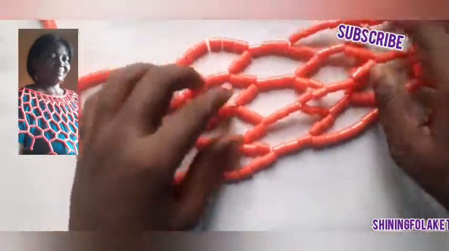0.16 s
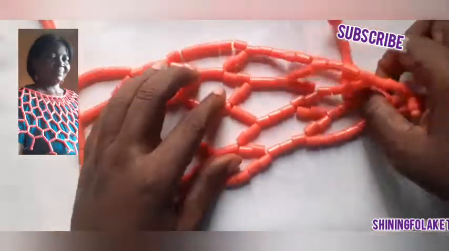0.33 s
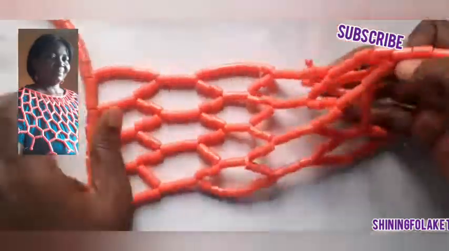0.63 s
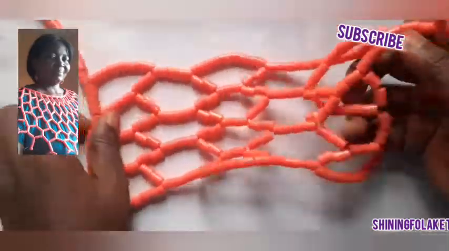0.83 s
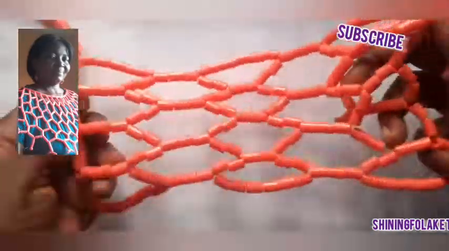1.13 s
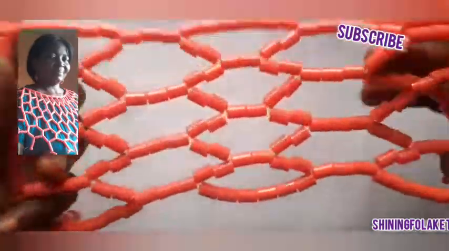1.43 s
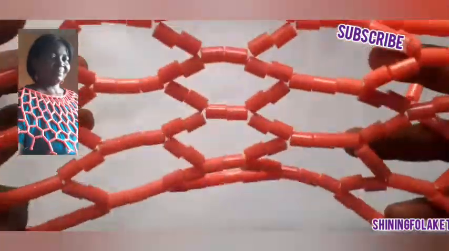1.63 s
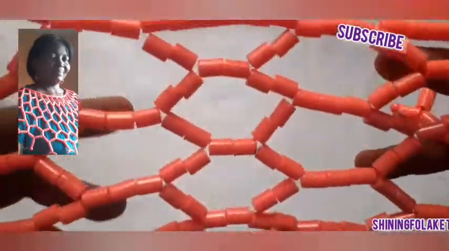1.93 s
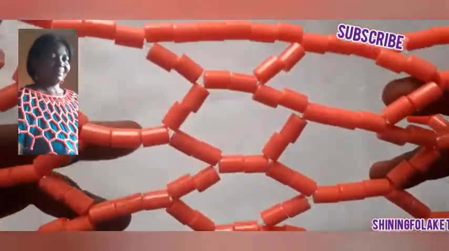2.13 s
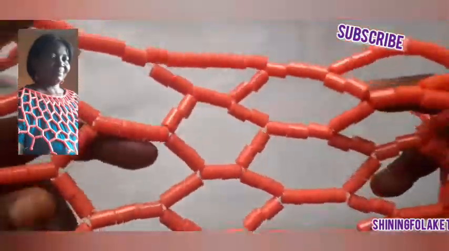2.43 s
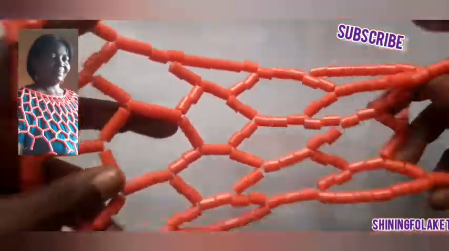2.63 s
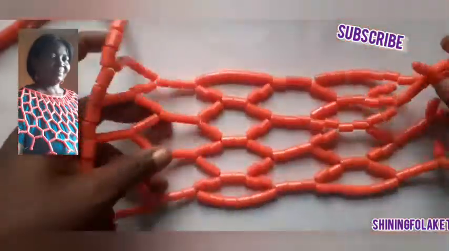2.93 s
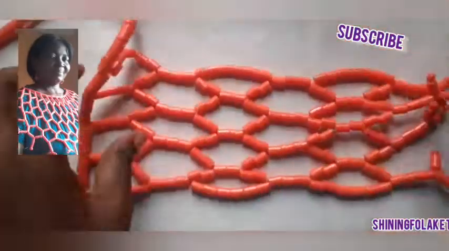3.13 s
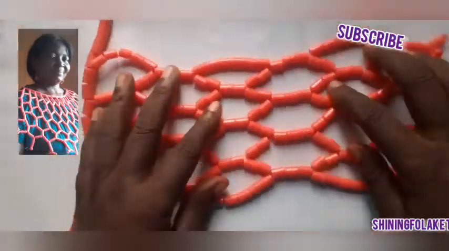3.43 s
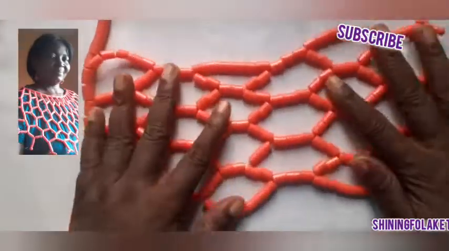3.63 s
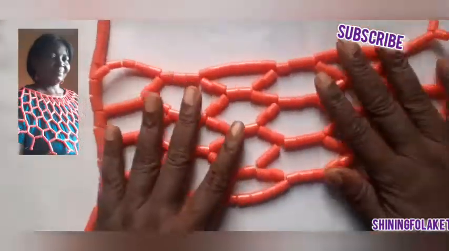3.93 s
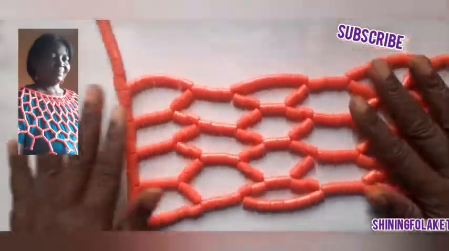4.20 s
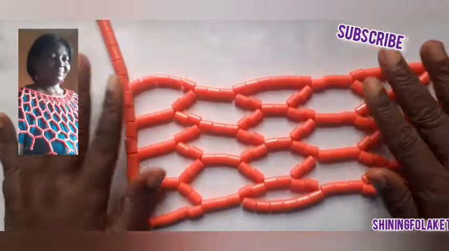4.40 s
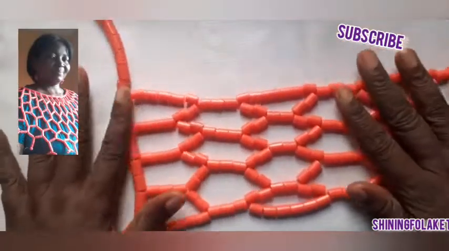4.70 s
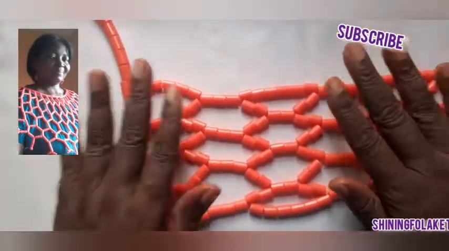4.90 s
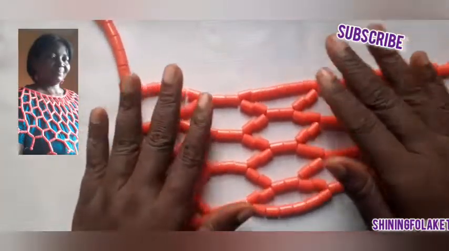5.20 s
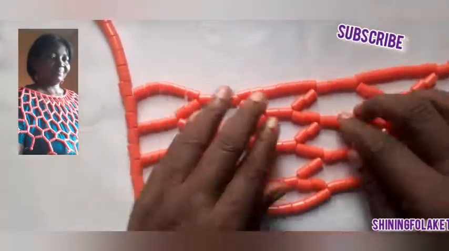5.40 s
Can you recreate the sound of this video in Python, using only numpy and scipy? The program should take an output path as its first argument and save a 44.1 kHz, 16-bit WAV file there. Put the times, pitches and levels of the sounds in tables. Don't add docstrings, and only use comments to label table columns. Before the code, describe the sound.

Close, dry stereo sound in a small quiet room with a faint low hum. From 0 to 0.6 s, hollow plastic beads are dragged in short bright rattles, with a cluster of sharp clicks near 0.2 s and soft finger thumps. A fuller thump comes at 0.7 s; strokes thin and fade to about 1.5 s as the net lifts. From 1.5 to 2.5 s it is nearly silent, with only tiny thin ticks of swinging strings. At 2.6 s rattling returns; between 2.7 and 3.7 s the net lands with dense clatter, hard snaps near 3.0, 3.25 and 3.7 s, and hollow table knocks. Smoothing slides follow to 4.3 s, then a gap. Low, dull thumps at 4.5 s and, strongest, 5.0 s come with brief rubs; two more near 5.5 s end with a short bead slide. Beads have a crisp high rattle; the table booms briefly, weighted to the right.

```python
import sys
import numpy as np
from scipy import signal
from scipy.fft import rfft, irfft, next_fast_len
from scipy.io import wavfile
from scipy.ndimage import map_coordinates

SR = 44100
rng = np.random.default_rng(int(sys.argv[2]) if len(sys.argv) > 2 else 0)


def wav_record(signal):
    frames = np.transpose(np.atleast_2d(signal))
    bounded = np.clip(frames, -1, 1)
    quanta = np.round(bounded * 32767).astype(np.int16)
    wavfile.write(sys.argv[1], SR, quanta)


def gain_from_db(level_db):
    decades = np.asarray(level_db, float) / 20
    return 10 ** decades


N = 244755
STEP = 32
SIDES = np.array([[1], [-1]])

# f/Hz, level/dB [dB per Hz]
RATTLE_SPECTRUM = [(260, -34), (450, -27.5), (492, -40), (625, -41), (748, -38), (1300, -36.5),
                   (1470, -12.5), (2510, -6.5), (4430, -15.5), (8290, -12.5), (10100, -26), (15100, -12.5),
                   (16000, -50)]


def rattle(level_db, bright_db, dull_db, pan_db):
    impacts = contacts(1800 * gain_from_db(3.0 * drift(60)), spread_db=3.5)
    scrape, body, shell = 0, 0, 0
    for hz in np.geomspace(480, 15300, 24):
        near = impacts * (rng.random(N) < .5) + 0.22 * rng.standard_normal(N)
        far = near * rng.choice([-1, 1], N)
        resonance = signal.butter(2, [hz / 1.09, hz * 1.09], "band", fs=SR, output="sos")
        tone = rms_one(signal.sosfilt(resonance, pair(near, far, hz)))
        tone = tone * gain_from_db(2.1 * drift(11))
        tone = tone * gain_from_db(at_hz(RATTLE_SPECTRUM, hz)) * np.sqrt(hz)
        tone = tone * panned(1.67 * np.log2(hz / 3000))
        low, high = np.clip(np.log2([1500 / hz, hz / 3600]) / .6, 0, 1)
        scrape = scrape + low * tone
        body = body + (1 - low - high) * tone
        shell = shell + high * tone
    mixed = rms_one(body)
    mixed = mixed + gain_from_db(bright_db - 5.5) * rms_one(shell)
    mixed = mixed + gain_from_db(dull_db - 7.0) * rms_one(scrape)
    return gain_from_db(level_db - 0.5 + 1.65 * drift(19)) * panned(pan_db) * mixed


# start t/s, stop t/s, start level/dB, stop level/dB, hardness/dB
GATHER_STROKES = [(0.0, 0.049, -45, -58, -0.5), (0.172, 0.254, -54, -39.5, 3),
                  (0.264, 0.439, -44.5, -51.5, 1), (0.464, 0.555, -53.5, -45.5, 1),
                  (0.656, 0.84, -53.5, -51, 3), (0.853, 1.14, -51, -65, 4.5),
                  (1.143, 1.209, -64.5, -53.5, 5), (1.235, 1.36, -57, -70.5, 3),
                  (1.388, 1.533, -70.5, -65, 8.5), (1.543, 1.79, -70.5, -89.5, 5.5),
                  (2.203, 2.557, -86.5, -87.5, 15.5)]
SMOOTHING_STROKES = [(2.554, 2.661, -74.5, -58.5, 7), (2.732, 2.789, -47.5, -57.5, 1.5),
                     (2.835, 2.864, -50, -39, 3.5), (2.893, 2.998, -60.5, -45, 5),
                     (3.023, 3.139, -47, -54.5, 5.5), (3.12, 3.217, -66, -58, 4),
                     (3.242, 3.285, -47.5, -59, 7.5), (3.313, 3.372, -48.5, -40, 4.5),
                     (3.381, 3.613, -41.5, -58.5, 3.5), (3.65, 3.697, -50, -45.5, 3.5),
                     (3.763, 3.915, -62.5, -58.5, 2), (3.923, 4.163, -51, -44.5, 1),
                     (4.194, 4.279, -60.5, -58.5, 0), (4.398, 4.44, -81.5, -73, 3.5),
                     (4.476, 4.524, -54.5, -55.5, 5), (4.546, 4.733, -50.5, -59.5, 2),
                     (4.79, 4.92, -77, -80, 3), (4.986, 5.092, -53.5, -53.5, -0.8),
                     (5.138, 5.177, -54.5, -54, 2.2), (5.404, 5.45, -62, -62.5, 1.5),
                     (5.467, 5.547, -55.5, -50, 3)]
# t/s, weight on the table/dB, left-right level/dB
HANDS = [(0, -1.5, -6), (.15, 1.5, -8), (.3, -5.5, -4), (.66, -0.5, -6), (.8, -1.5, -4.5), (1.1, 6.5, -4.5),
         (1.5, 1.5, -7.5), (1.8, 1.5, -7.5), (2.5, 3.5, -9), (2.85, -1, -6), (3.15, 1.5, -4),
         (3.5, 0.5, -6), (3.9, 0.5, -6), (4.14, 3, -5.5), (4.44, 4, -8.5), (4.7, 3.5, -6.5),
         (5.2, 3.5, -7.5), (5.55, 4.5, -6)]


def handling():
    still_db, still_hard_db = -88, 8
    shake_s = 0.031
    t = np.arange(0, N + STEP, STEP) / SR
    hand_s, weight, place = np.transpose(HANDS)
    weight_db, pan_db = np.interp(t, hand_s, weight), np.interp(t, hand_s, place)
    power = gain_from_db(still_db) ** 2
    hard = power * still_hard_db
    for *shape, hard_db in [*GATHER_STROKES, *SMOOTHING_STROKES]:
        stroke = swell(*shape)
        power = power + stroke
        hard = hard + stroke * hard_db
    level_db = 10 * np.log10(power)
    bright_db = hard / power
    dull_db = -3.5 + 0.45 * bright_db + 0.89 * weight_db
    mean_stroke_db = -52.5
    shake = gain_from_db(-53.5 + 0.45 * (level_db - mean_stroke_db) + weight_db) ** 2
    for s, low_db, upper_db, _ in THUMPS:
        shake = shake + gain_from_db(low_db + 0.31 * upper_db - 16.5) ** 2 * swell(s, s + shake_s, 0, 0)
    return [smooth(c) for c in (level_db, bright_db, dull_db, pan_db, 10 * np.log10(shake))]


def swell(start, stop, first_db, last_db):
    start_db_per_s, settle_db_per_s = 909, 260
    t = np.arange(0, N + STEP, STEP) / SR
    slide_db = np.interp(t, [start, max(stop, start + .005)], [first_db, last_db])
    onset_db = start_db_per_s * np.maximum(start - t, 0)
    settle_db = settle_db_per_s * np.maximum(t - stop, 0)
    return gain_from_db(slide_db - onset_db - settle_db) ** 2


# t/s, shell peak level/dB, body level/dB, length/ms
KNOCKS = [(.0272, -58, -41.5, 1.2), (.162, -49, -42.5, 3.1), (.1968, -39, -39.5, 8.7),
          (.2044, -23, -35.5, 17), (.2262, -23, -38.5, 10), (.2667, -20.5, -49, 5.4),
          (2.694, -33, -42.5, 5), (2.8189, -26, -45, 1.9), (2.833, -39, -39, 3), (2.8404, -43, -34.5, 3.2),
          (2.8486, -42, -29.5, 2.5), (2.8634, -26, -23.5, 6.8), (2.8797, -35, -32.5, 4.1),
          (2.9494, -32, -36.5, 2.9), (3.011, -15.5, -25.5, 1.35), (3.1264, -22, -35, 3.5),
          (3.3126, -34, -36, 2.9), (3.3204, -19, -35, 2.7), (3.3608, -40, -41, 9.9),
          (3.4618, -24, -34, 5.7), (3.6616, -49, -37, 1.4), (3.9264, -23.5, -34.5, 6.3),
          (3.933, -36, -33, 4.5), (4.5196, -43, -31, 4.8), (4.5284, -51, -23.5, 1.8),
          (4.983, -44, -45, 8.1), (4.9918, -35, -31, 4.5), (5.436, -47, -38.5, 1.4),
          (5.4635, -29, -33, 3.4), (5.5296, -28, -35.5, 5.1)]
# t/s, shell peak level/dB, body level/dB, left-right level/dB
TICKS = [(0.278, -18, -34, -5), (0.3264, -29.5, -49, -10), (0.3957, -28, -49, -10), (0.521, -35, -48, -2),
         (0.5908, -20, -62, -3.5), (0.6484, -31, -57, -3), (0.668, -21, -62, 0), (0.696, -30, -52, 2),
         (0.7416, -32, -36.5, -6), (0.851, -25.5, -51, -1), (0.94, -31, -46, -11), (0.98, -26.5, -50, -7),
         (2.585, -33, -76, -4), (2.636, -30.5, -49, -3), (2.659, -31.5, -51, 1), (2.912, -21, -62, -5),
         (2.9763, -40, -56, 3), (3.7834, -44, -42.5, -5), (3.2482, -15.5, -40, -3),
         (3.2804, -26, -49, -5.5), (3.434, -22, -50, -10), (3.582, -35, -52, -6), (3.639, -40, -48, -7),
         (3.688, -16, -59, -4), (3.8259, -27.5, -44, -8), (4.4702, -27.5, -47, -5), (4.976, -31, -49, -5),
         (5.244, -46, -86, -7), (5.394, -33, -59, -10), (5.408, -35, -45, -5)]
# t/s, shell peak level/dB, left-right level/dB
SWINGS = [(1.1658, -47, 1), (1.4331, -42.5, 1), (1.5346, -57, -6), (1.739, -53, -4), (1.931, -53, -1),
          (2.197, -58, -9), (2.2458, -41, -13), (2.2753, -47.5, -10), (2.2957, -49, -5.5),
          (2.36, -49.5, -15), (2.413, -50, -5), (2.4394, -60, -8.5), (2.558, -49.5, -15),
          (4.8773, -58, -14), (4.91, -55, -16)]


def every_click():
    tick_ms, swing_ms, swing_body_db = 3.16, 6.7, -37
    hand_s, _, place = np.transpose(HANDS)
    knocks = [(s, shell, body, np.interp(s, hand_s, place), ms) for s, shell, body, ms in KNOCKS]
    ticks = [(*row, tick_ms) for row in TICKS]
    swings = [(s, shell, shell + swing_body_db, pan, swing_ms) for s, shell, pan in SWINGS]
    return knocks + ticks + swings


# f/Hz, level/dB, T60/s
BEAD_MODES = [(880, -5, 0.0048), (1630, -35, 0.0057), (2090, 4.5, 0.0017), (2730, -14.5, 0.0045),
              (3610, -57, 0.00092)]


def bead_clicks():
    t = np.arange(1300) / SR
    clicks = every_click()
    cracks = rng.standard_normal((len(clicks), 2, 2, len(t)))
    out = np.zeros((2, 2, N + len(t)))
    for (s, shell_db, body_db, pan_db, ms), (near, far) in zip(clicks, cracks):
        for part, level_db in enumerate([body_db, shell_db]):
            length = np.clip(ms, .4, 9) / 1000 * [.55, .25][part]
            shape = t / length * np.exp(1 - t / length)
            spiky = near[part] * np.abs(near[part]) ** 1.6
            spiky = spiky * np.sqrt(np.sum(shape ** 2) / np.sum((shape * spiky) ** 2))
            wave = shape * pair(spiky, spiky * np.sign(far[part]), [2500, 9000][part])
            out[part, :, round(s * SR):][:, :len(t)] += gain_from_db(level_db) * panned(pan_db) * wave
    push = np.diff(out[0], prepend=0)
    body = sum(gain_from_db(db) * ring(push, hz, t60) for hz, db, t60 in BEAD_MODES)
    shell = signal.sosfilt(signal.butter(2, 4000, "high", fs=SR, output="sos"), out[1])
    shell = shell + gain_from_db(-20) * ring(shell, 8300, .002)
    return (gain_from_db(-5.5) * body + gain_from_db(-13.5) * shell)[:, :N]


# t/s, peak level/dB, upper modes level/dB, ring share left by the hand [0-1]
THUMPS = [(0.186, -37, -2.5, 0.63), (0.277, -37, 4, 0.21), (0.721, -28.5, -23, 1), (0.756, -47, 13, 0.68),
          (0.8, -40.5, 8, 0.26), (1.006, -63, 20, 0.97), (1.19, -67, 16, 0.89), (2.7, -36.5, 2, 0.56),
          (2.873, -28.5, -1.5, 0.54), (3.124, -58, 20, 1), (3.18, -52, 12, 0.8), (3.252, -27.5, -6, 0.62),
          (3.325, -34.5, -2, 0.97), (3.568, -31.5, -4.5, 0.97), (3.938, -33, -6, 0.71),
          (4.167, -60, -1, 0.23), (4.527, -25.5, -31, 0.63), (4.992, -21.5, -21, 0.52),
          (5.397, -50.5, -3, 1), (5.473, -28.5, -22, 0.73), (5.536, -28.5, -12.5, 0.73)]
# f/Hz, level/dB, T60/s, left-right level/dB
TABLE_MODES = [(121.9, -2, 0.42, -9), (158.6, -3, 0.078, -14), (242.7, -2.5, 0.2, -11),
               (327, -1, 0.19, -10.5), (378.5, -7.5, 0.13, -12.5), (415, -13.5, 0.063, -17.5),
               (660, -8, 0.032, -11)]


def table(rumble_db):
    rub_db_per_octave = 2.5
    t = np.arange(SR // 2) / SR
    luck = rng.standard_normal((len(THUMPS), 2, len(TABLE_MODES)))
    out = np.zeros((2, N + len(t)))
    for k, (hz, level_db, t60, pan_db) in enumerate(TABLE_MODES):
        for (s, low_db, upper_db, free), (size, pitch) in zip(THUMPS, luck):
            rise = np.sin(np.pi / 2 * np.minimum(t * hz / 1.5, 1)) ** 2
            decay = np.exp(-np.log(1000) * t / (t60 * np.clip(free, .2, 2)))
            wave = rise * np.sin(2 * np.pi * hz * (1 + .02 * pitch[k]) * t) * decay
            gain_db = low_db + (k > 1) * (upper_db + 1.4 * size[k]) + level_db - 5.5
            out[:, round(s * SR):][:, :len(t)] += panned(pan_db) * gain_from_db(gain_db) * wave
        rub = rng.standard_normal((2, N)) * gain_from_db(rumble_db + 1.6 * drift(7))
        rub_db = level_db - 30 + rub_db_per_octave * np.log2(hz / 240)
        out[:, :N] += panned(pan_db) * gain_from_db(rub_db) * ring(pair(*rub, hz), hz, 0.52 * t60)
    return out[:, :N]


def room(x):
    size = next_fast_len(N + SR)
    hz = np.arange(size // 2 + 1) * SR / size
    t60 = 0.2 / (1 + hz / 7000)
    echo = np.zeros((2, len(hz)), complex)
    for k, lag in enumerate(rng.uniform(0.0033, 0.018, 12)):
        loop = np.exp(-np.log(1000) * lag / t60 - 2j * np.pi * hz * lag)
        echo[k % 2] += loop / (1 - loop) * (-1) ** (k // 2)
    return irfft(rfft(x.mean(axis=0), size) * echo, size)[:, :N]


# f/Hz, level/dB
ROOM_TONE = [(18, -31), (30, 13), (90, -40), (134, 16.5), (194, -17), (233, 11), (319, 10.5), (600, -10),
             (801, -17), (1100, -10), (4530, -43.5), (8520, -19), (16000, -24)]


def room_tone():
    room_db = -62.5
    out, edges = 0, 30 * 2 ** np.arange(0, 9.6, .5)
    white = rng.standard_normal((2, 2, N))
    for k, (low, high) in enumerate(zip(edges, edges[1:])):
        half_octave = signal.butter(2, [low, min(high, 19000)], "band", fs=SR, output="sos")
        band = signal.sosfilt(half_octave, white[k % 2])
        hz = np.sqrt(low * high)
        out = out + gain_from_db(at_hz(ROOM_TONE, hz)) * pair(*band, hz) * panned(-9.0 if hz < 600 else -3.0)
    return gain_from_db(room_db - 9.5) * rms_one(out)


# f/Hz, left-right correlation [0-1]
LIKENESS = [(60, 0.77), (180, 0.88), (550, 0.68), (1650, 0.24), (4970, 0.15), (15000, 0.48)]


def pair(mid, side, hz):
    alike = np.clip(at_hz(LIKENESS, hz) + 0.1, 0, .99)
    return (np.sqrt(1 + alike) * mid + np.sqrt(1 - alike) * side * SIDES) / np.sqrt(2)


def panned(pan_db):
    return gain_from_db(SIDES * np.asarray(pan_db) / 2)


def contacts(per_s, spread_db):
    sizes = gain_from_db(spread_db * np.minimum(rng.exponential(1, N), 5)) * rng.choice([-1, 1], N)
    return sizes * (rng.random(N) < per_s / SR)


def ring(clicks, hz, t60):
    r, w = np.exp(-np.log(1000) / (t60 * SR)), 2 * np.pi * hz / SR
    return signal.lfilter([0, np.sin(w)], [1, -2 * r * np.cos(w), r * r], clicks + 1e-18)


def drift(rate):
    r = np.exp(-2 * np.pi * rate * STEP / SR)
    noise = rng.standard_normal((N + SR) // STEP + 2)
    slow = signal.lfilter([1], [1, -2 * r, r * r], noise)
    return rms_one(smooth(slow[SR // STEP:]))


def smooth(steps):
    return np.interp(np.arange(N) / STEP, np.arange(len(steps)), steps)


def at_hz(points, hz):
    f, value = np.transpose(points)
    return np.interp(np.log(hz), np.log(f), value)


def rms_one(x):
    return x / np.sqrt(np.mean(x ** 2) + 1e-20)


def scene():
    level_db, bright_db, dull_db, pan_db, rumble_db = handling()
    beads = rattle(level_db, bright_db, dull_db, pan_db) + bead_clicks()
    beads[0] = map_coordinates(beads[0], [np.arange(N) - .6], order=3)
    near = beads + gain_from_db(-19) * room(beads) + table(rumble_db)
    return signal.sosfilt(signal.butter(2, 75, "high", fs=SR, output="sos"), near) + room_tone()


def top_cut(x):
    return signal.sosfilt(signal.butter(12, 17000, fs=SR, output="sos"), x)


def record(dry):
    rounded = .25 * np.tanh(dry / .25)
    cut = signal.sosfilt(signal.cheby2(10, 50, 16600, fs=SR, output="sos"), rounded)
    return top_cut(cut)


dry = scene()
out = record(dry)
wav_record(out)
```